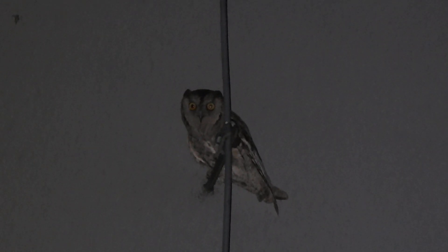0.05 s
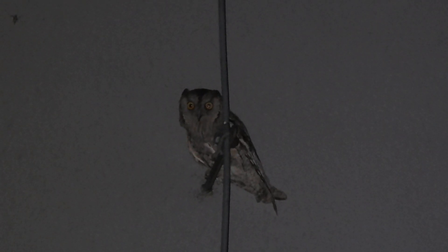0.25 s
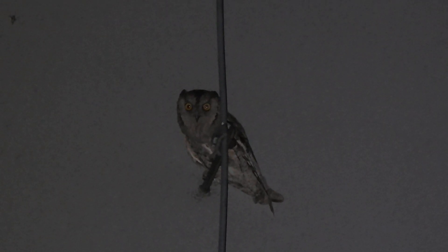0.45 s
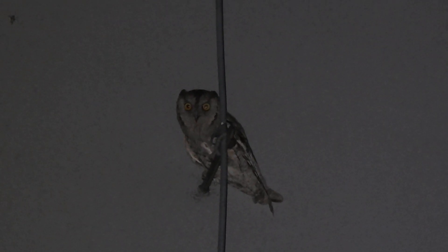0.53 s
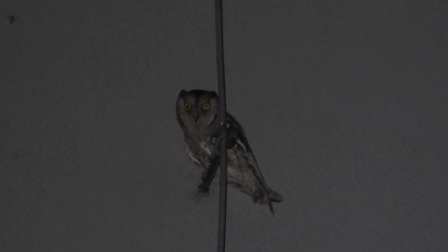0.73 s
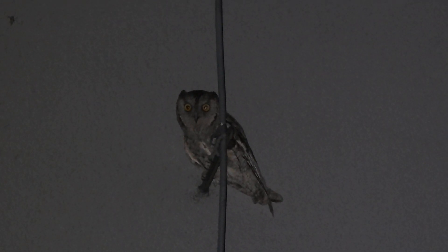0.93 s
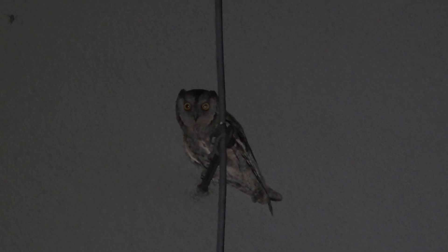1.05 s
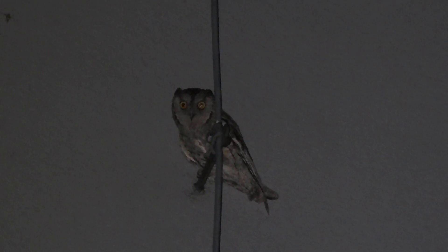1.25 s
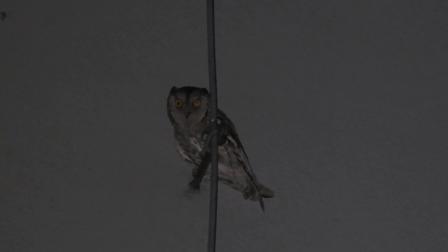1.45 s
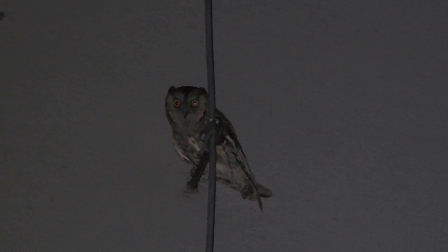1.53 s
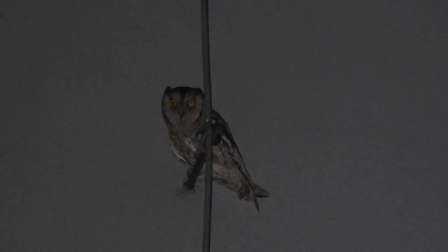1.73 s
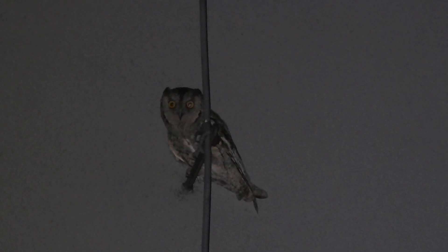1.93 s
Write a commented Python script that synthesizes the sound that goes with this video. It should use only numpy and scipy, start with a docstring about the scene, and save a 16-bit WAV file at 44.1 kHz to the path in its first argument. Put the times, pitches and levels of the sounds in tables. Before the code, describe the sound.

Single brief flute-like owl hoot at night, with soft distant traffic rumble and faint crickets behind.

```python
"""A scops owl gives one short whistle at night, close to a house wall: a near sine with weak overtones.
The note drops in from above, holds nearly level, swells and sags; delayed, filtered copies are the wall echoes.
Behind it lie a distant traffic rumble and thin hiss, both shaped noise, and a faint hum, drone and whine,
all wavering sines. Far bush crickets are pulsed noise; a few tiny ticks are noise bursts in a resonance."""
import sys
import numpy as np
from scipy import signal
from scipy.fft import rfft, irfft
from scipy.io import wavfile
from scipy.ndimage import uniform_filter1d

SR = 44100
rng = np.random.default_rng(int(sys.argv[2]) if len(sys.argv) > 2 else 0)


def generate_wav(signal):
    """Clip the signal to [-1, 1] and save it as 16-bit WAV at the path in sys.argv[1]."""
    frames = np.transpose(np.atleast_2d(signal))
    scaled = np.clip(frames, -1, 1) * 32767
    pcm = np.round(scaled).astype(np.int16)
    wavfile.write(sys.argv[1], SR, pcm)


N = 88200   # length [samples], two seconds

# Distant traffic rumble, strength along the spectrum: (frequency [Hz], relative level [dB per Hz])
RUMBLE_SPECTRUM = [(25, -28), (40, -11), (54, -4), (72, -2), (100, -3), (135, -8.5), (190, -8.5),
                   (240, -17), (400, -18), (560, -15.5), (820, -13.5), (1100, -13.5), (1400, -22.5),
                   (1700, -29.5), (2100, -36), (3000, -69)]
RUMBLE_DB, RUMBLE_SIDE_DB, RUMBLE_FLICKER_DB = -38, -15.5, .6
# Rise and fall of the rumble's upper band: (time [s], level [dB])
UPPER_RUMBLE_LEVEL = [(0, 1), (.7, 0.5), (1.1, -1), (1.6, 0.5), (1.85, 3.5), (2, 0)]
UPPER_HZ, UPPER_WIDTH_HZ = 1300, 990

# Low drone within the rumble: (frequency [Hz], width of wander [Hz], level [dB])
DRONE_TONES = [(68.6, 3, -45.5), (100.7, 3, -47)]

# Thin hiss, strength along the spectrum: (frequency [Hz], relative level [dB per Hz])
HISS_SPECTRUM = [(2000, 1.5), (3200, -3.5), (4500, 4.5), (5600, 0), (6500, 3.5), (7800, -0.5), (9300, -8.5),
                 (11000, -11.5), (15500, -12.5)]
HISS_DB, HISS_SIDE_DB, HISS_FLICKER_DB = -56.5, -1, .15

# The hum as it comes and goes: (time [s], level [dB])
HUM_LEVEL_CURVE = [(0, -51), (.21, -41.5), (.29, -47), (.58, -54.5), (.69, -47), (.76, -45), (.82, -63),
                   (1.09, -49.5), (1.4, -61), (2, -56)]
HUM_HZ, HUM_WIDTH_HZ, HUM_WAVER_DB = 599.3, 7, 3

WHINE_HZ, WHINE_DB = 11000, -84.5   # thin steady whine, probably electronic

# Bush crickets' runs of chirps: (first chirp [s], last chirp limit [s], period [s], level [dB])
CRICKET_RUNS = [(.036, 1.05, .1072, -57.5), (1.070, 1.55, .1088, -58), (1.63, 2.0, .109, -61)]
STROKE_S, STROKE_GAP_S = .011, .033   # half length of a wing stroke; spacing within a pair
CHORUS_DB = -65   # steady blur of farther crickets
# Rasp of the wings, strength along the spectrum: (frequency [Hz], relative level [dB per Hz])
RASP_SPECTRUM = [(7000, -10), (8200, -2), (8950, -1), (9200, 3.5), (9500, -1.5), (10500, -5), (11200, -13),
                 (12200, -24)]
RASP_SIDE_DB = 2.5

# Faint dry ticks: (time [s], level [dB])
TICK_TIMES = [(0.592, -49), (0.8303, -45), (0.9686, -37)]
TICK_HZ, TICK_WIDTH_HZ = 6500, 1200
TICK_T60_S = 0.011   # time for a burst to fall by 60 dB

# Reflections from walls: (delay [s], level [dB])
WALL_ECHOES = [(.01047, -19), (.0186, -16), (.05269, -30), (.13818, -25), (.20367, -36)]
ECHO_CUT_HZ = 6000   # the walls dull what lies above
BEAM_DELAY_S, BEAM_DB, BEAM_ABOVE_HZ = .01041, -6, 2600   # nearest wall returns overtones most strongly
YARD_DB, YARD_T60_S = -37, .5

# The owl's note: (time [s], pitch [Hz])
OWL_PITCH = [(.229, 1680), (.237, 1560), (.2445, 1250), (.258, 1240), (.288, 1236), (.335, 1265),
             (.385, 1293), (.418, 1302), (.451, 1288), (.470, 1235)]
# The owl's effort through the note: (time [s], level [dB])
OWL_EFFORT = [(.225, -49), (.236, -29.5), (.244, -16.5), (.262, -19), (.322, -20.5), (.365, -17),
              (.412, -14), (.457, -17), (.470, -26.5), (.484, -41)]
# Overtones of the whistle: (multiple of the pitch [times], level against the fundamental [dB])
OWL_OVERTONES = [(2, -45), (3, -43), (4, -53), (5, -44.5)]
WAVER_SHARE, WAVER_RATE_HZ = 0.00064, 70   # tiny unsteadiness, as a share of the pitch
FLUTTER_DB, OVERTONE_FLUTTER_DB, FLUTTER_RATE_HZ = -0.24, 1.5, 10
SCOOP_END_S, SCOOP_FADE_S = .241, 0.0033   # the drop into the note, and how its extra brightness fades
SCOOP_BRIGHT_DB = 10   # boost of the second harmonic during the drop

LEFT_DB, RIGHT_DB = -0.91, 0.74
TOP_STOP_HZ = 16200   # from here up, at least 70 dB is taken away


def from_db(db):
    """Turn decibels into a gain."""
    return 10 ** (np.asarray(db) / 20)


def rms_one(x):
    """Scale a signal to an average power of one."""
    return x / np.sqrt(np.mean(x ** 2) + 1e-20)


def in_time(rows):
    """Join (time, value) rows by straight lines, one value per sample."""
    return np.interp(np.arange(N) / SR, *np.transpose(rows))


def drift(rate_hz):
    """Smoothed noise: a random wander of spread 1, quicker for a higher rate."""
    step = 40   # the wander is computed on every 40th sample
    r = np.exp(-2 * np.pi * rate_hz * step / SR)
    noise = rng.standard_normal(N // step + 2002)
    slow = signal.lfilter([1], [1, -2 * r, r * r], noise)[2000:]   # skip the filter's start
    return np.interp(np.arange(N) / step, np.arange(len(slow)), rms_one(slow))


def resonate(x, hz, width_hz):
    """One resonance with a gain of about one at its peak."""
    r = np.exp(-np.pi * width_hz / SR)
    feed = np.array([1, 0, -1]) * (1 - r * r) / 2
    ring = [1, -2 * r * np.cos(2 * np.pi * hz / SR), r * r]
    return signal.lfilter(feed, ring, x + 1e-18)


def stereo(pair, side_db):
    """Build left and right from a shared signal and one that is opposite in the two channels."""
    shared, opposed = pair
    return shared + from_db(side_db) * opposed * np.array([[1], [-1]])


def banded_noise(spectrum, flicker_db, side_db):
    """Stereo noise in third-octave bands, each flickering a little in level; unit power."""
    hz, db = np.transpose(spectrum)
    edges = 22 * 2 ** (np.arange(30) / 3)
    white = rng.standard_normal((2, 2, N + SR // 2))
    out = 0
    for k, (low, high) in enumerate(zip(edges, edges[1:])):
        bandpass = signal.butter(2, [low, high], "band", fs=SR, output="sos")
        # neighbouring bands use different noise; the filter's start is dropped
        band = signal.sosfilt(bandpass, white[k % 2])[:, -N:]
        band_db = np.interp(np.log(low * high) / 2, np.log(hz), db)
        outside = max(hz[0] / high, low / hz[-1], 1)   # above 1 beyond the ends of the table
        out = out + band * from_db(band_db + flicker_db * drift(10)) / outside ** 4
    return rms_one(stereo(out, side_db))


def wavering(hz, width_hz):
    """A sine of unit power whose pitch wanders, built by adding up its frequency."""
    pitch = hz + width_hz / 2 * drift(7)
    cycles = rng.random() + np.cumsum(pitch / SR)
    return np.sqrt(2) * np.sin(2 * np.pi * cycles)


def traffic_rumble():
    """Low-heavy noise whose upper band slowly rises and falls."""
    rumble = from_db(RUMBLE_DB) * banded_noise(RUMBLE_SPECTRUM, RUMBLE_FLICKER_DB, RUMBLE_SIDE_DB)
    upper = resonate(rumble, UPPER_HZ, UPPER_WIDTH_HZ)
    return rumble + (from_db(in_time(UPPER_RUMBLE_LEVEL)) - 1) * upper


def drone():
    """Low sines that waver in pitch within the rumble."""
    return sum(from_db(db) * wavering(hz, width_hz) for hz, width_hz, db in DRONE_TONES)


def hiss():
    """Thin noise, mostly high in pitch."""
    return from_db(HISS_DB) * banded_noise(HISS_SPECTRUM, HISS_FLICKER_DB, HISS_SIDE_DB)


def hum():
    """A sine that wavers in pitch and level as it comes and goes."""
    level_db = in_time(HUM_LEVEL_CURVE) + HUM_WAVER_DB * drift(11)
    return from_db(level_db) * wavering(HUM_HZ, HUM_WIDTH_HZ)


def whine():
    """A very faint high sine, nearly steady in pitch."""
    return from_db(WHINE_DB) * wavering(WHINE_HZ, width_hz=1)


def night():
    """Add up the background: rumble, drone, hiss, hum and whine."""
    return traffic_rumble() + drone() + hiss() + hum() + whine()


def crickets():
    """Paired wing strokes pulse a noisy rasp, about nine pairs a second, over a blur of farther singers."""
    t = np.arange(N) / SR
    strokes = np.zeros(N)
    for first, last, period, db in CRICKET_RUNS:
        for chirp in np.arange(first, last, period):
            for centre in (chirp, chirp + STROKE_GAP_S):
                stroke = np.exp(-((t - centre) / STROKE_S) ** 2)
                strokes += from_db(db + rng.normal(0, 1)) * stroke
    hz, db = np.transpose(RASP_SPECTRUM)
    bins_hz = np.linspace(0, SR / 2, N // 2 + 1)
    colour = from_db(np.interp(bins_hz, hz, db, left=-np.inf, right=-np.inf))   # silent outside the table
    noise = irfft(rfft(rng.standard_normal((2, N))) * colour, N)
    rasp = rms_one(stereo(noise, RASP_SIDE_DB))
    return rasp * np.hypot(strokes, from_db(CHORUS_DB))


def ticks():
    """Each tick is a noise burst of a few milliseconds, passed twice through one high resonance."""
    t = np.arange(N) / SR
    bursts = sum((t >= s) * from_db(db - 60 * np.abs(t - s) / TICK_T60_S) for s, db in TICK_TIMES)
    grain = bursts * rng.standard_normal((2, N))
    for _ in range(2):
        grain = resonate(grain, TICK_HZ, TICK_WIDTH_HZ)
    # make up for the power lost in the narrow resonance
    return stereo(grain, side_db=-1) * np.sqrt(SR / (np.pi * TICK_WIDTH_HZ))


def yard(x):
    """The direct sound, dulled wall echoes, one bright near reflection and a weak diffuse tail."""
    t = np.arange(N) / SR
    dull = signal.sosfilt(signal.butter(1, ECHO_CUT_HZ, fs=SR, output="sos"), x)
    bright = signal.sosfilt(signal.butter(6, BEAM_ABOVE_HZ, "high", fs=SR, output="sos"), x)
    echoes = sum(from_db(db) * np.interp(t - delay, t, dull, left=0) for delay, db in WALL_ECHOES)
    beam = from_db(BEAM_DB) * np.interp(t - BEAM_DELAY_S, t, bright, left=0)
    # fading noise stands for many scattered reflections
    scatter = stereo(rng.standard_normal((2, N)), side_db=-7.5) * from_db(-60 * t / YARD_T60_S)
    tail = signal.fftconvolve(dull[None], rms_one(scatter) / np.sqrt(N), axes=1)[:, :N]
    return x + echoes + beam + from_db(YARD_DB) * tail


def owl():
    """A near sine with weak, unsteady overtones, following pitch and effort."""
    t = np.arange(N) / SR
    pitch = in_time(OWL_PITCH) * (1 + WAVER_SHARE * drift(WAVER_RATE_HZ))
    phase = 2 * np.pi * np.cumsum(pitch) / SR
    scoop_db = SCOOP_BRIGHT_DB * np.clip((SCOOP_END_S - t) / SCOOP_FADE_S, 0, 1)
    voice = np.sin(phase)
    for multiple, db in OWL_OVERTONES:
        overtone_db = db + OVERTONE_FLUTTER_DB * drift(FLUTTER_RATE_HZ)
        if multiple == 2:
            overtone_db = overtone_db + scoop_db
        voice = voice + from_db(overtone_db) * np.sin(multiple * phase)
    start, end = OWL_EFFORT[0][0], OWL_EFFORT[-1][0]
    sounding = uniform_filter1d(((t > start) & (t < end)) * 1., size=128)   # on and off with soft edges
    effort_db = in_time(OWL_EFFORT) + FLUTTER_DB * drift(FLUTTER_RATE_HZ)
    return np.sqrt(2) * voice * sounding * from_db(effort_db)


def scene():
    """The owl straight ahead, over the night background."""
    return night() + crickets() + ticks() + yard(owl())


def record(dry):
    """The right microphone is a little more sensitive; the top is cut."""
    lowpass = signal.cheby2(20, 70, TOP_STOP_HZ, fs=SR, output="sos")
    return signal.sosfilt(lowpass, dry * from_db([[LEFT_DB], [RIGHT_DB]]))


dry = scene()
out = record(dry)
generate_wav(out)
```